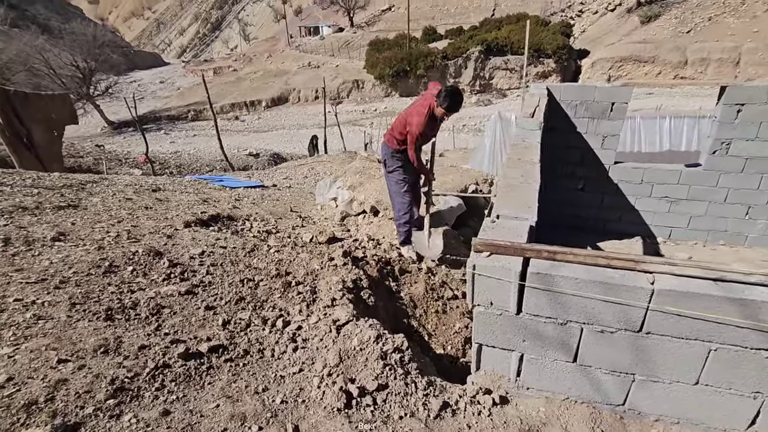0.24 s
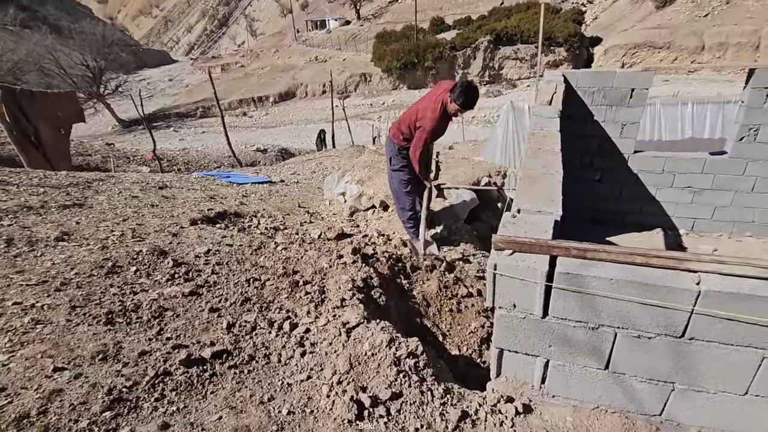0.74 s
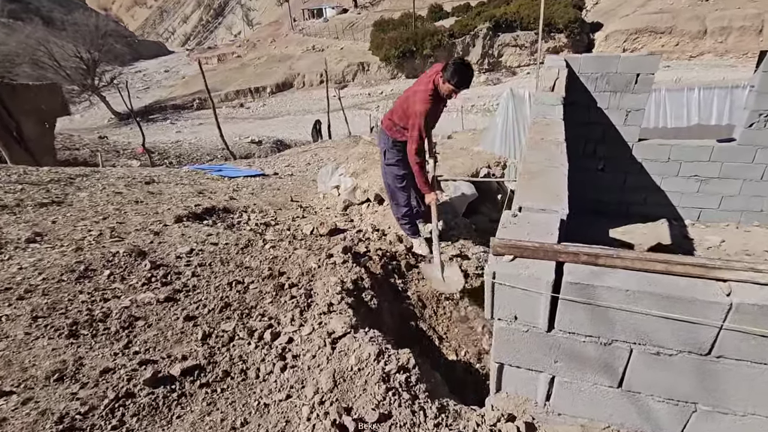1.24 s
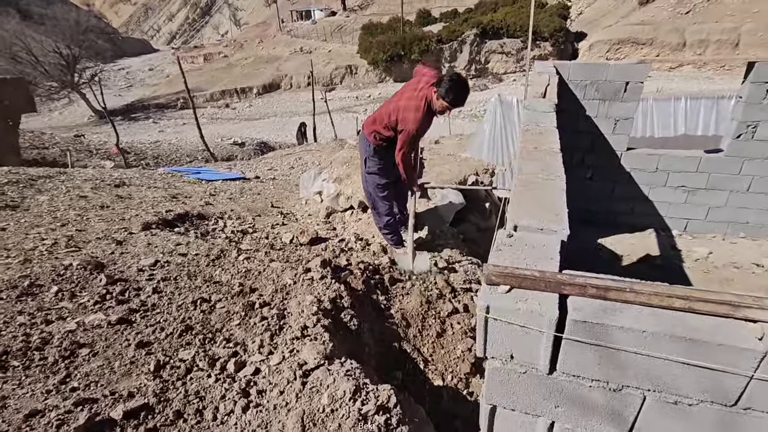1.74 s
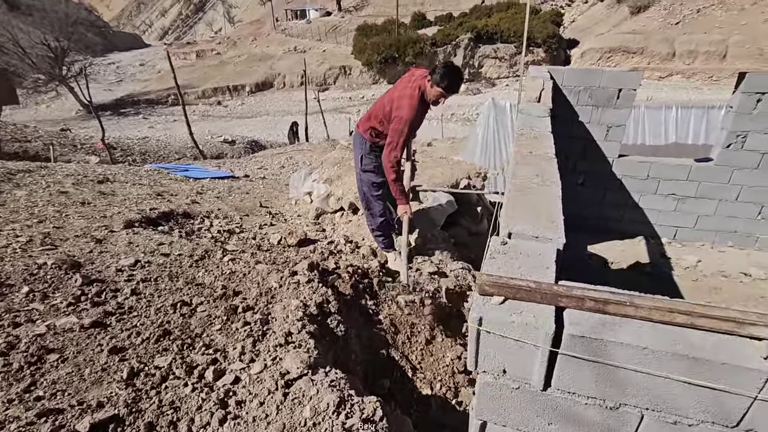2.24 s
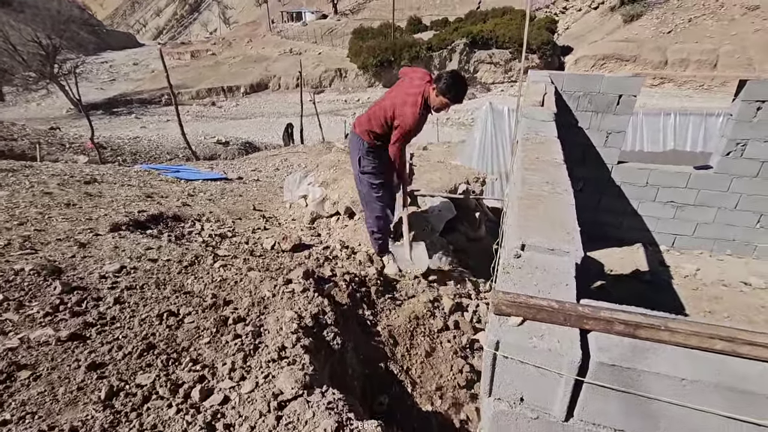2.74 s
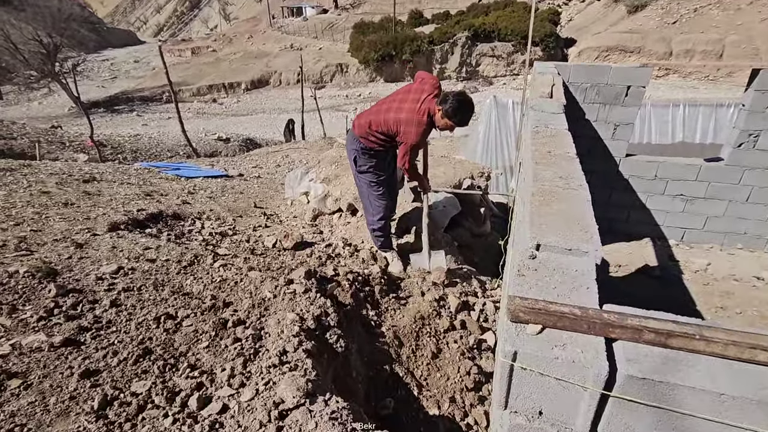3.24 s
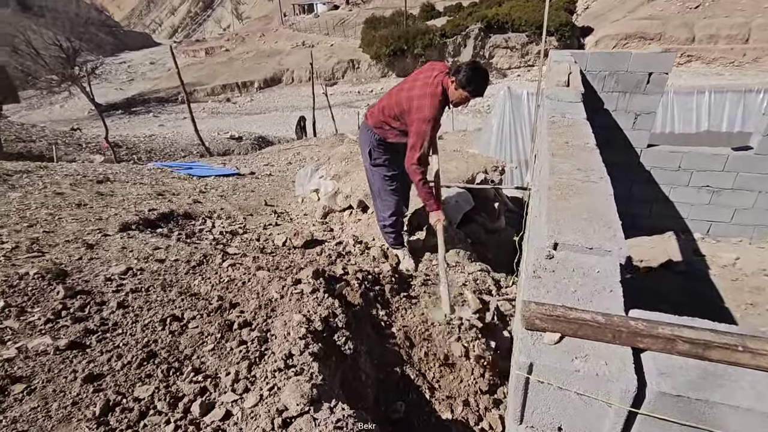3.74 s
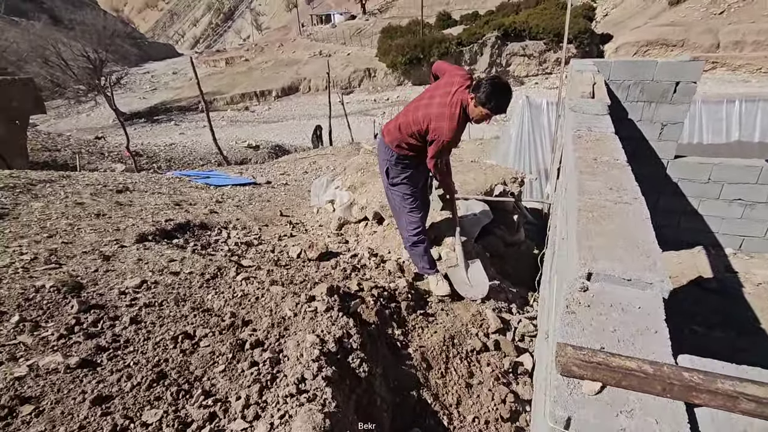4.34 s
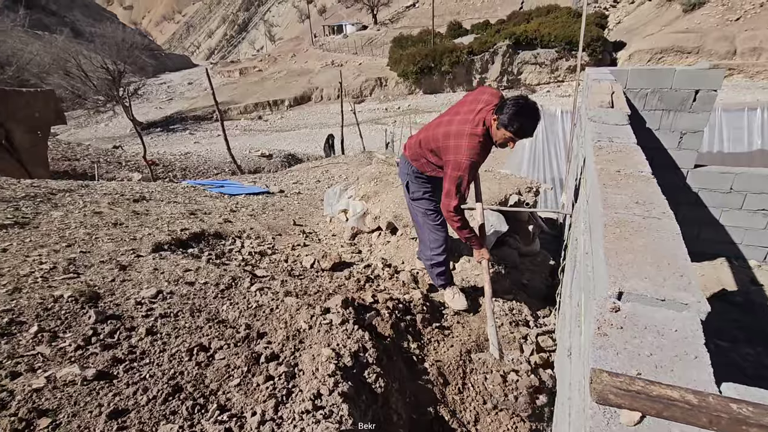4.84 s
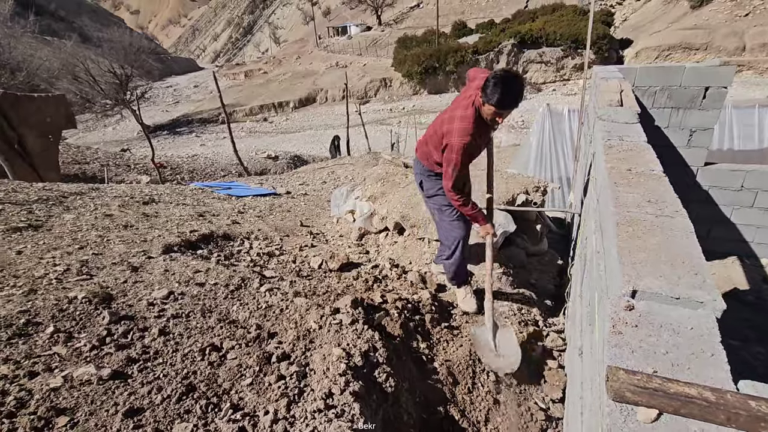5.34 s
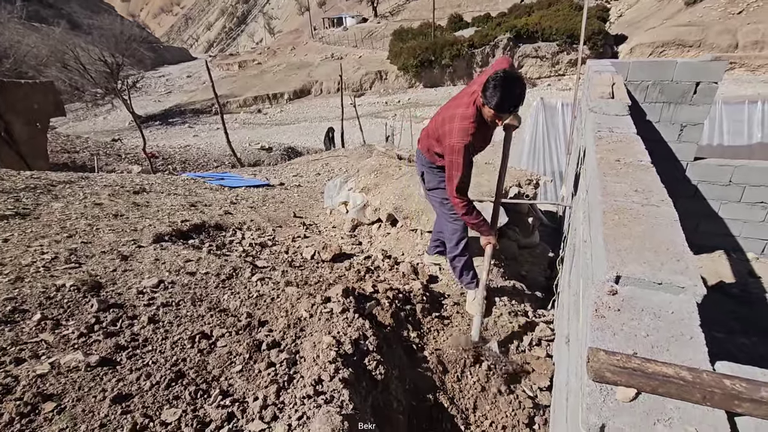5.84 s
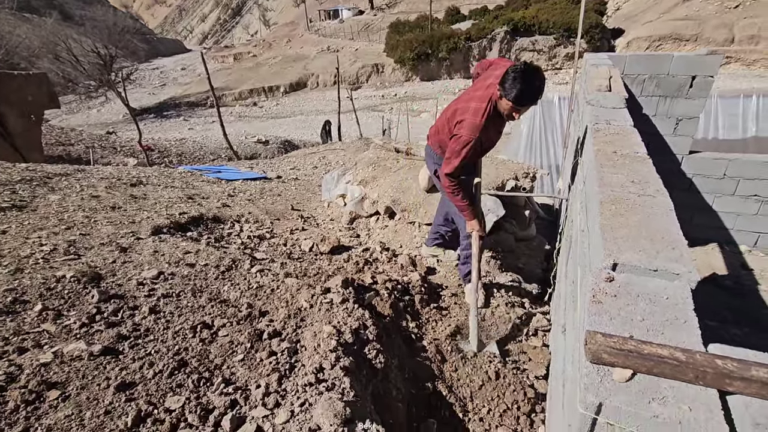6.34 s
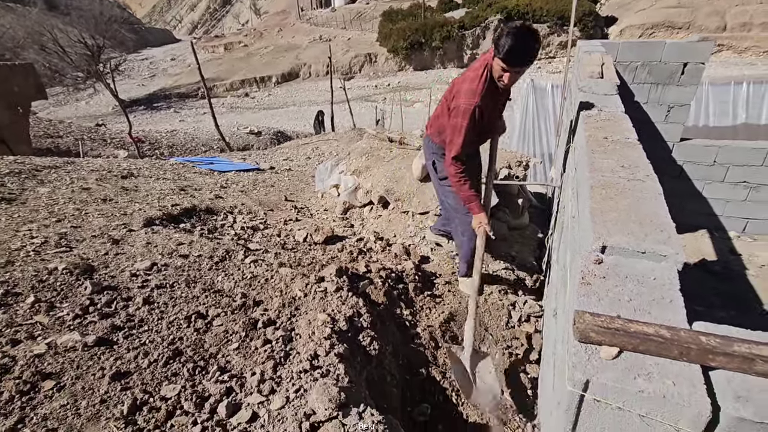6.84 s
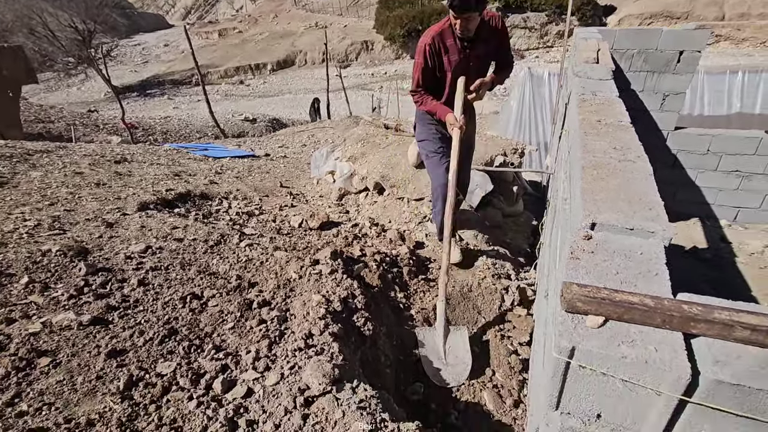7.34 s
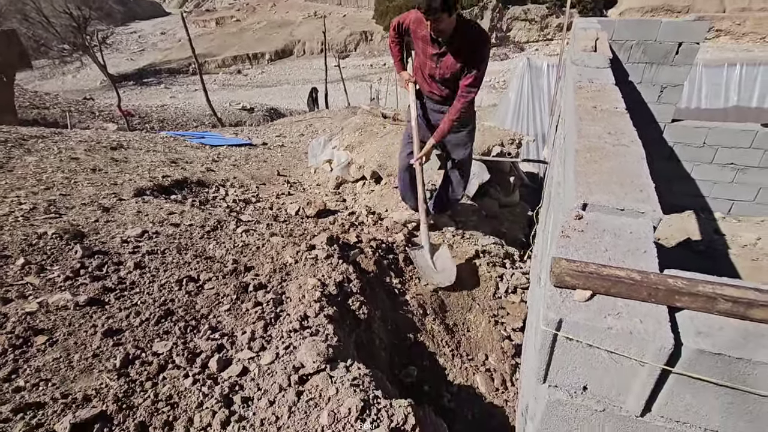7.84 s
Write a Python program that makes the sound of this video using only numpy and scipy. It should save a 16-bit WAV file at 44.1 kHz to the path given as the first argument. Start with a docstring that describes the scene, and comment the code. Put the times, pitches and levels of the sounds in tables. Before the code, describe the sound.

Outdoors, a few metres from a stereo pair, a shovel blade scrapes and jabs into gravelly earth. Each stroke crunches, clinks against stones and trails off in gritty rustle and small ticks; the metal rings briefly when lifted and sounds dead when buried. Clods thud softly. Quieter gaps separate the strokes, the middle ones are densest, and a hard bright strike comes late before light scraping. A close wall adds a tight, noisy slap over barely audible air.

```python
"""Shovel in stony ground

A steel shovel digs beside a block wall, outdoors, a few metres from a pair of microphones.
Clumped noise grains make the grit grinding along the blade; short crumbling bursts are stones knocking it.
The same force rings the blade's modes, long in the air and damped when buried, while pebbles tick.
Clods and steps thud as short low sines over a soil rumble. The wall throws back a short noisy echo.
Banded noise makes the faint hiss of the open air."""
import sys
import numpy as np
from scipy import signal
from scipy.fft import rfft, irfft
from scipy.io import wavfile
from scipy.ndimage import map_coordinates

SR = 44100
rng = np.random.default_rng(int(sys.argv[2]) if len(sys.argv) > 2 else 0)


def wav_record(signal):
    """Record a signal, one row per channel, as 16-bit PCM in the file named by sys.argv[1]."""
    frames = np.transpose(np.atleast_2d(signal))
    bounded = np.clip(frames, -1, 1)
    # unit amplitude maps onto the largest positive 16-bit level
    quanta = np.round(bounded * 32767).astype(np.int16)
    wavfile.write(sys.argv[1], SR, quanta)


N = 357210

# Stones knock the blade; levels set the contact before its colouring, t60 before each range's fall power:
# start_s, edge_db, body_over_edge_db, crack_over_edge_db, body_hz, clink_hz, contact_t60_s
STONE_KNOCKS = [(0.0236, -45.5, -13, -31, 760, 1250, 0.025), (0.5652, -29, -4.5, 2, 528, 1400, 0.081),
                (0.5988, -28.5, -3.5, -19, 467, 1263, 0.077), (0.635, -28, -16.5, -27, 530, 2220, 0.04),
                (0.6877, -50, 9.5, -15, 520, 2780, 0.04), (0.7471, -40.5, -6.5, -13, 700, 1135, 0.06),
                (0.7754, -29.5, -12.5, -14, 582, 2680, 0.05), (0.8175, -21.5, -19, -2, 527, 3100, 0.018),
                (0.842, -26.5, -36, 0, 520, 2620, 0.014), (0.871, -31, -37, -13, 540, 2490, 0.033),
                (0.924, -30.5, -16.5, -3, 690, 1496, 0.04), (1.139, -32, -22, -6, 720, 3020, 0.014),
                (1.321, -47.5, -25, 10, 530, 2230, 0.015), (1.358, -44.5, -23, -4, 533, 2470, 0.019),
                (7.233, -50, -23, -17, 546, 1270, 0.027), (7.386, -43, -34, -2.5, 540, 3190, 0.03),
                (0.9085, -20, -36, -13, 715, 2180, 0.011), (1.078, -34.5, -12.5, -21, 541, 2070, 0.032),
                (1.2494, -39, -19, -11, 544, 2200, 0.017), (1.2996, -44, -14, -17, 463, 1920, 0.077),
                (1.5887, -43, -24, -31, 522, 1320, 0.01), (1.7456, -23.5, -12, -4, 564, 1280, 0.044),
                (1.791, -20.5, -11, 8.5, 870, 2230, 0.037), (1.8106, -24.5, -5, -11, 355, 1420, 0.041),
                (1.8704, -39, -1, -18, 493, 1380, 0.039), (1.919, -36, -8, -10, 600, 1920, 0.033),
                (2.0425, -33, -8, -29, 580, 2000, 0.011), (2.1629, -34, -12.5, -23, 500, 1470, 0.027),
                (2.4006, -49.5, 9.5, -4, 500, 1570, 0.011), (2.6432, -50, 11, -17, 550, 1270, 0.028),
                (2.709, -24.5, -33, -27, 468, 1590, 0.018), (2.741, -32.5, -31, 22.5, 366, 3680, 0.014),
                (2.812, -52, -2, -23, 770, 1230, 0.047), (2.8507, -50, -3.5, -35, 790, 1210, 0.042),
                (2.9454, -45.5, -32, 0, 464, 2860, 0.011), (3.0895, -23.5, 1.5, -5.5, 528, 2157, 0.042),
                (3.1464, -31.5, 3.5, -14, 705, 1510, 0.018), (3.174, -31.5, 1.5, 3.5, 526, 1455, 0.04),
                (3.223, -10.5, 2.5, -8.5, 570, 1710, 0.015), (3.2404, -19.5, -3, -20, 700, 1570, 0.021),
                (3.3412, -27, -0.5, 10, 750, 1410, 0.024), (3.3943, -33.5, -3.5, -1, 478, 1320, 0.12),
                (3.425, -32.5, -10, 4, 555, 1257, 0.057), (3.495, -31, -9, -13, 595, 1480, 0.031),
                (3.571, -29, -5.5, -9, 580, 1366, 0.045), (3.788, -24, -10.5, -6.5, 903, 1510, 0.038),
                (3.8467, -27.5, -9, -18, 617, 2140, 0.022), (3.8605, -12.5, -9.5, -10, 585, 1256, 0.019),
                (3.9365, -28.5, -32, -26, 720, 2020, 0.0073), (4.0577, -42, 4, -14, 640, 1400, 0.018),
                (4.176, -49, -16.5, 9, 533, 1445, 0.043), (2.079, -43.5, 5, 12.5, 556, 3250, 0.013),
                (2.222, -45, -18, -4, 560, 2920, 0.012), (4.4104, -44, 2.5, -10, 525, 1320, 0.13),
                (4.441, -31, -17, 6, 527, 1410, 0.052), (4.4689, -15, -13, 4, 530, 1330, 0.022),
                (4.5144, -22, -10, -15, 637, 1370, 0.023), (4.5499, -17.5, -3, 0, 557, 2050, 0.016),
                (4.6189, -29, 0, -28, 575, 1310, 0.038), (4.672, -28.5, -33, -13, 527, 1370, 0.036),
                (4.7329, -35.5, -13, -14, 490, 1340, 0.033), (5.0261, -40.5, -27, 10.5, 690, 1290, 0.019),
                (5.053, -36.5, -43, -3, 740, 1536, 0.039), (5.3736, -33.5, -6.5, -0.5, 786, 1300, 0.032),
                (5.6072, -60.5, 3, -23, 727, 1300, 0.052), (5.7644, -38.5, -22, -49, 670, 2060, 0.042),
                (5.8087, -30, -21, 8, 626, 1463, 0.16), (5.852, -29, -3, -15, 495, 1330, 0.047),
                (5.8979, -36.5, 7.5, -12, 477, 2970, 0.038), (6.352, -35.5, -28, -26, 506, 1450, 0.013),
                (6.3898, -25.5, -10, -42, 570, 1340, 0.023), (6.486, -43, 10.5, -14, 557, 1370, 0.025),
                (6.5553, -32.5, -11.5, -13, 745, 1390, 0.014), (6.604, -44, -8, -6, 830, 1210, 0.018),
                (6.637, -51, -34.5, 11.5, 406, 1205, 0.02), (6.7386, -44, -21, 2, 714, 1320, 0.056),
                (6.8152, -44.5, -7, 21.5, 686, 2095, 0.017), (6.93, -69.5, 18, 0, 494, 1280, 0.026),
                (7.047, -28.5, -16, -3, 560, 1220, 0.024), (7.0604, -13, -8.5, -9.5, 695, 2230, 0.051),
                (7.0699, -4, -24, -10, 690, 3040, 0.017), (7.1242, -35.5, -0.5, -14, 750, 1080, 0.015),
                (7.3635, -42, -23, 1, 546, 2970, 0.048), (7.447, -51, -7, 3.5, 533, 2130, 0.037),
                (7.5088, -50.5, -3.5, 2.5, 745, 2170, 0.056), (7.8366, -39, -14.5, 10.5, 568, 2090, 0.076),
                (7.894, -33, -29, -42.5, 540, 3180, 0.032), (8.0494, -34.5, -12.5, -11, 575, 2100, 0.051),
                (0.984, -46.5, 1, -10, 470, 2080, 0.019), (1.043, -43.5, -8, -15, 560, 1400, 0.05),
                (1.2273, -54, -15, -9, 900, 2100, .015), (1.644, -60, 14, -14, 500, 1310, 0.013),
                (2.0057, -56.5, 13, -10, 600, 1300, 0.027), (2.0667, -59, 11, -13, 566, 1300, 0.028),
                (2.1431, -41, -8, -15, 595, 1500, 0.039), (2.3601, -48.5, -4.5, -12, 545, 1480, 0.036),
                (3.308, -42, 9, 0, 600, 1400, .02), (3.445, -24, -16, -5, 600, 3250, 0.029),
                (6.429, -44.5, -8, -15, 560, 1380, 0.033), (6.475, -42, -16, -17, 600, 1300, 0.023),
                (6.754, -44, -7, -9, 600, 1250, .015), (8.024, -62.5, 12.5, -7, 474, 1290, 0.022)]
# Scrapes and slides of grit, with levels of the driving gains:
# loudest_s, rise_s, fall_s, edge_db, body_over_edge_db, sand_over_edge_db, soil_over_edge_db
GRIT_SCRAPES = [(.044, 0.09, 0.13, -75, 12, -26, 3), (.144, 0.19, 0.04, -71.5, -4, 3, 6),
                (.247, 0.11, 0.052, -73.5, 2, 6, 7), (.571, 0.0039, 0.017, -28.5, -8, -14.5, -30),
                (0.588, 0.017, 0.059, -45.5, 6.5, 3.5, 10.5), (.688, 0.095, 0.099, -61, 7, -4, -13),
                (.786, 0.046, 0.11, -43, -0.5, -5.5, -40), (0.922, 0.12, 0.074, -45.5, -13, -4.5, -33),
                (1.087, 0.24, 0.23, -57, -7.5, -2, -35), (1.315, 0.11, 0.14, -64.5, -5, -6, -3),
                (1.51, 0.15, 0.21, -81.5, 12, -20, 17.5), (1.748, 0.0075, 0.2, -44, 4, -5, 3),
                (1.801, 0.033, 0.052, -44.5, 10.5, 5.5, 9.5), (1.952, 0.19, 0.094, -57, 9.5, -8, -15),
                (2.154, 0.12, 0.13, -51.5, -1.5, -5.5, -14), (2.23, 0.11, 0.066, -62, -10, -3, -18),
                (2.37, 0.083, 0.17, -60.5, -2.5, -7, -18), (2.45, 0.14, 0.093, -59, -16, -3.5, -17),
                (2.515, 0.22, 0.05, -61.5, -5.5, -2, -20), (2.656, 0.11, 0.19, -71.5, 18, 8, -3),
                (2.73, 0.11, 0.052, -59, -20, -2, 5.5), (2.756, 0.061, 0.034, -61.5, -21, 10, 11.5),
                (2.85, 0.22, 0.35, -82, -17, -20, 9), (3.095, 0.0043, 0.062, -51, 12.5, -1.5, 4),
                (3.167, 0.032, 0.02, -42, 8, -5.5, -21), (3.233, 0.02, 0.025, -37.5, 11, -10, -16),
                (3.33, 0.26, 0.4, -51, 10.5, 0, 2.5), (3.454, 0.043, 0.018, -39.5, 1.5, -4, -3.5),
                (3.56, 0.19, 0.22, -52.5, -9, -5.5, -18), (3.788, 0.06, 0.033, -44.5, 2.5, -13, 0.5),
                (3.871, 0.088, 0.07, -48.5, 5, 1, -20), (4.075, 0.1, 0.1, -57.5, -17, 3, 6),
                (4.295, 0.052, 0.09, -72, 16, -18, 8), (4.419, 0.0063, 0.15, -49.5, 2, -3.5, -27),
                (4.468, 0.029, 0.13, -34, -6.5, -5.5, -18), (4.561, 0.094, 0.18, -43, 5.5, -6, 0),
                (4.725, 0.36, 0.15, -53, -3, -2, -24), (5.07, 0.03, 0.35, -58, -7, -4, -29),
                (4.93, 0.14, 0.6, -64, -1.5, -26, -8), (5.21, 0.27, 0.056, -56, -8, -0.5, -25),
                (5.276, 0.14, 0.18, -76, 19, -8, 23.5), (5.376, 0.11, 0.027, -57.5, -16, 7, 6),
                (5.626, 0.17, 0.086, -73.5, 4.5, -16.5, 1.5), (5.765, 0.0067, 0.21, -46.5, -9, -5, -21),
                (5.82, 0.03, 0.067, -32.5, -6, -3, -18), (5.908, 0.12, 0.025, -45, 9, 5, 9),
                (5.95, 0.046, 0.12, -71.5, 11, -14, 11), (6.1, 0.18, 0.16, -83, -7, 15, -8.5),
                (6.33, 0.047, 0.93, -66.5, 9, -9, -15), (6.487, 0.52, 0.15, -67, 0, -2.5, -20),
                (6.69, 0.11, 0.14, -65, -15, -6, -6), (6.76, .12, 0.12, -56.5, -11.5, -1.5, -25),
                (6.83, 0.13, 0.062, -61, -5, 3.5, -11), (7.068, 0.0089, 0.0066, -24.5, -10, -17, -30),
                (7.09, 0.088, 0.062, -56.5, 12, 4.5, 5.5), (7.2, 0.3, 0.17, -64.5, -11, -1.5, -14),
                (7.3, 0.14, 0.1, -72, 1, 6, -4), (7.376, 0.075, 0.044, -61, -14, -3, -3),
                (7.454, 0.11, 0.015, -71, 9, -3, 3), (7.519, 0.024, 0.02, -68, 4.5, -11, -3),
                (7.697, 0.022, 0.072, -56.5, -4, 3.5, -15), (7.733, 0.04, 0.016, -58.5, -26.5, 10.5, -19.5),
                (7.79, 0.13, 0.12, -69, -15, 8, -20), (7.839, 0.031, 0.079, -51, -20, 2.5, -35),
                (7.895, 0.095, 0.013, -62, -4.5, 4.5, -23.5), (8.063, 0.046, 0.04, -51.5, -9.5, -1.5, -1.5)]
SWELL_DB = 20  # a scrape gains this much over its rise and loses it over its fall
# Modes of the blade: mode_hz, relative_level_db, free_air_t60_s
BLADE_MODES = [(172, -8, .12), (421, -12, .35), (524, 0, .11), (700, -1, .33), (797, -12, .15),
               (900, -5, .26), (1255, -7, .12), (1400, -8, .08), (1472, -4, .12), (1522, -5, .1),
               (1615, -9, .1), (1918, -11, .12), (2090, -5, .08), (2165, -6, .08), (2550, -7, .07),
               (2920, -8, .06), (3020, -9, .07), (3330, -9, .06), (3720, -14, .06), (3930, -14, .06),
               (4700, -15, .05), (5070, -15, .05), (5450, -16, .05)]
BURIED_T60_SHARE = 0.13
# Spells with the blade out of the soil: from_s, to_s, freedom (0-1)
BLADE_LIFTS = [(.88, 1.3, .6), (2.12, 2.6, .35), (3.84, 3.94, .7), (5.03, 5.25, .45), (6.65, 6.95, .4),
               (7.2, 7.6, .85), (7.66, 8.2, .7)]
LIFT_RAMP_S = 0.033  # the blade comes free and sinks back over this time
# Brightness of the edge, low in loose soil and high on bare stone: time_s, upper_over_lower_db
EDGE_BRIGHTNESS = [(0, -3), (.8, 2), (1.05, -7), (1.3, -2), (1.9, -4), (2.15, -9), (2.42, -9), (2.52, -5),
                   (2.7, -18), (3.3, -7), (3.45, -1.5), (3.8, -2), (4.1, -7.5), (4.3, -25), (4.45, -1.5),
                   (4.7, -12), (5.1, -13.5), (5.8, 1.5), (6.35, -15), (6.7, -10), (6.8, -1), (7.3, -5.5),
                   (7.85, 3.5), (8.1, -6.5)]
EDGE_TURN_HZ = 1850
# The contact wanders over the blade and favours now one mode, now another
WANDER_DB, WANDER_HZ = 3.0, 8.0
# Colour of stone and soil when struck: freq_hz, relative_level_db (per Hz)
STONE_COLOUR = [(150, -11), (350, -13.5), (540, -0.5), (900, -12.5), (1450, 0), (2500, -5), (4200, -3.5),
                (7000, -3), (11000, -9), (16000, -10)]
# Pitches that part body from edge and edge from crack: split_hz
RANGE_SPLITS_HZ = [1100, 4000]
# Clods and steps on the soil: start_s, envelope_peak_db, pitch_hz, t60_s, rise_ms (time constant)
SOIL_THUDS = [(0.591, -45, 98.5, 0.17, 1.2), (0.777, -43.5, 229, 0.065, 0.77), (1.067, -57, 214, 0.084, 1),
              (1.254, -53.5, 271, 0.075, 1), (1.489, -35.5, 123, 0.036, 12), (1.524, -52, 118, 0.092, 4),
              (1.76, -44, 87, 0.24, 2.3), (1.801, -26.5, 280, 0.067, 0.76), (1.827, -38, 85, 0.044, 1),
              (2.39, -52, 285, 0.037, 0.89), (2.746, -45.5, 142, 0.064, 4.5), (3.785, -46, 48.3, 0.12, 13),
              (4.085, -48, 42.3, 0.13, 12), (1.855, -42, 50, .15, 10), (5.93, -45.5, 45, .15, 7.7),
              (3.173, -26, 128, 0.024, 1), (3.21, -34.5, 115, 0.15, 2.2), (3.34, -26.5, 212, 0.013, 1.2),
              (3.763, -40.5, 153, 0.043, 1), (3.85, -38.5, 180.5, 0.16, 1.1), (4.061, -54, 128, 0.1, 4.4),
              (4.455, -40, 135, 0.086, 1.2), (4.538, -39.5, 100, 0.24, 2), (5.258, -40.5, 140, 0.041, 1),
              (5.333, -42.5, 96.9, 0.075, 1), (5.601, -55, 198, 0.04, 1), (5.809, -57, 125, 0.1, 1),
              (5.867, -27.5, 98, 0.031, 1.1), (6.369, -54, 205, 0.072, 1), (6.933, -53, 110, 0.054, 2),
              (7.045, -32, 97.7, 0.056, 0.91), (8.021, -45, 108, 0.039, 0.92)]
# Where the blade is: time_s, left_lag_samples, left_over_right_db
BLADE_PLACE = [(0, 1, -0.5), (1, 1, 0.7), (1.7, 2, 0.7), (2.2, -0.5, 1.5), (2.8, -0.5, 1), (3.7, 2, 1.5),
               (4.2, 3.5, 1), (5.2, 5, 1), (5.8, 3, 1), (6.7, 4.5, 0.5), (7.2, 0, 0.5), (8.1, 1, 1)]
ECHO_DRIFT_HZ = 11
# Colour of the open air: freq_hz, relative_level_db (per Hz)
AIR_COLOUR = [(25, 0), (120, -9), (390, -15), (600, -8), (1000, -15), (1400, -14), (2900, -22), (5500, -29),
              (9000, -34), (16000, -35)]
AIR_DB = -70.5
# Likeness of the air at the two microphones: freq_hz, left_right_likeness (-1 opposed, 0 unrelated, 1 alike)
AIR_ALIKE = [(60, 0.39), (240, 0.088), (950, 0.23), (3770, -0.64), (15000, 0.73)]
STOP_HZ = 16300


def shovel():
    """Stone and soil crunch directly; the same force rings the blade, long where free, short where buried."""
    force, notes = contacts()
    free = freedom()
    tilt_db, = in_time(EDGE_BRIGHTNESS)
    body, edge, crack = signal.oaconvolve(force, stone_answers(), axes=1)[:, :N]
    low_pass = signal.butter(4, EDGE_TURN_HZ, fs=SR, output="sos")
    high_pass = signal.butter(4, EDGE_TURN_HZ, "high", fs=SR, output="sos")
    lower = from_db(-tilt_db / 2) * signal.sosfilt(low_pass, edge)
    upper = from_db(tilt_db / 2) * signal.sosfilt(high_pass, edge)
    out = notes + body + crack + lower + upper
    for hz, level_db, t60 in BLADE_MODES:
        # modes above the body range share the brightness of the edge
        bright_db = np.sign(hz - EDGE_TURN_HZ) * (hz > RANGE_SPLITS_HZ[0]) * tilt_db / 2
        reach = from_db(WANDER_DB * drift(WANDER_HZ) + bright_db)
        push = reach * force[np.searchsorted(RANGE_SPLITS_HZ, hz)]
        # a stone's own note passes into the free blade and wakes the modes near its pitch
        out += from_db(level_db - 24) * ring(free * (push + .17 * notes), hz, t60)
        out += from_db(level_db - 36) * ring((1 - free) * push, hz, t60 * BURIED_T60_SHARE)
    return out


def contacts():
    """Force on the blade in three ranges of pitch, and the short notes of the stones themselves."""
    fine = grains(2500., spread_db=1.5, clump_db=3.0, clump_rate=70.0, smooth=0.8)
    # coarse gravel: separate stones in each range of pitch
    gravel = np.array([grains(110.0, spread_db=3.5, clump_db=3.0, clump_rate=11.0, smooth=0)
                       for _ in range(3)])
    grit = rms_one(fine + from_db([[-5.0], [-8.0], [-13.0]]) * gravel)
    force, notes = grit * scraping()[:3], np.zeros(N)
    t = np.arange(4000) / SR
    chips = rng.standard_normal((len(STONE_KNOCKS), len(t)))
    chips[:, 25] = 5.0  # one clean click just after the start
    for knock, chip in zip(STONE_KNOCKS, chips):
        s, edge_db, body_db, crack_db, body_hz, clink_hz, t60 = knock
        # the contact builds in about a millisecond, then crumbles away, the crack fastest
        build = 1 - np.exp(-t / 0.00095)
        fall = from_db(-60 * t / max(t60, .003)) ** np.array([[1.2], [1.1], [1.6]])
        gains = from_db(edge_db + np.array([[body_db], [0], [crack_db]])) * build * fall
        body_note = 1.99 * gains[0] * np.sin(2 * np.pi * body_hz * t)
        clink = 0.7 * gains[1] * np.sin(2 * np.pi * clink_hz * t)
        at = round(s * SR)
        force[:, at:at + len(t)] += (from_db(-8.5) * gains * chip)[:, :N - at]
        notes[at:at + len(t)] += (body_note + clink)[:N - at]
    return force, notes


def scraping():
    """Gains of body, edge, fine sand and soil rumble: each scrape swells and fades, powers add."""
    t, power = np.arange(0, N + 32, 32) / SR, 0
    for s, rise, fall, edge_db, body_db, sand_db, soil_db in GRIT_SCRAPES:
        away = np.maximum((s - t) / max(rise, .002), (t - s) / max(fall, .002))
        levels_db = edge_db + np.array([[body_db], [0], [sand_db], [soil_db]])
        power = power + from_db(levels_db - SWELL_DB * away) ** 2
    return np.array([np.interp(np.arange(N) / SR, t, np.sqrt(p)) for p in power])


def freedom():
    """How freely the blade hangs, 0 buried to 1 in the air."""
    t = np.arange(N) / SR
    spells = [share * np.clip(.5 + np.minimum(t - start, end - t) / LIFT_RAMP_S, 0, 1)
              for start, end, share in BLADE_LIFTS]
    return np.clip(np.max(spells, axis=0), 0, 1)


def stone_answers():
    """Causal response of stone and soil to a click, split into body, edge and crack, each of unit energy."""
    hz = np.maximum(np.arange(2049) * SR / 4096, 20)
    cepstrum = irfft(np.log(from_db(at_hz(STONE_COLOUR, hz))))
    cepstrum[1:2048] *= 2  # folding the cepstrum gives the minimum phase
    whole = irfft(np.exp(rfft(cepstrum[:2049], 4096)))[:2000]
    body = band(whole, 150, RANGE_SPLITS_HZ[0])
    edge = -band(whole, *RANGE_SPLITS_HZ)  # turned over so that it adds to the body where they meet
    crack = band(band(whole, RANGE_SPLITS_HZ[1], 21000), RANGE_SPLITS_HZ[1], 21000)
    parts = np.array([body, edge, crack])
    return parts / np.sqrt(np.sum(parts ** 2, axis=1, keepdims=True))


def pebbles():
    """Small stones tick at random under the scrapes, each ringing a few cycles at one of ten pitches."""
    sizes = from_db(2.4 * np.minimum(rng.exponential(1, N), 4)) * rng.choice([-1, 1], N)
    born = rng.random(N) < 90 / SR  # 90 ticks a second
    dealt = rng.integers(0, 10, N)
    ticks = 0
    for k, hz in enumerate(np.geomspace(900, 6000, 10)):
        ticks = ticks + ring(sizes * born * (dealt == k), hz, 12.0 / hz)
    return from_db(-2.5) * scraping()[1] * rms_one(ticks)


def soil():
    """Lumpy low rumble of moving earth, and soft pushes that ring a few cycles."""
    rumble = band(grains(300., spread_db=3.0, clump_db=2.5, clump_rate=15., smooth=.8), 50, 230)
    out = scraping()[3] * rms_one(rumble)
    t = np.arange(8000) / SR
    for s, peak_db, hz, t60, rise_ms in SOIL_THUDS:
        rise = (1 - np.exp(-1000 * t / max(rise_ms, .2))) ** 2
        shape = rise * from_db(-60 * t / max(t60, .01))
        thud = from_db(peak_db) * shape / shape.max() * np.sin(2 * np.pi * hz * t)
        at = round(s * SR)
        out[at:at + len(t)] += thud[:N - at]
    return out


def placed(x):
    """The sound reaches one microphone a few samples early; contacts wander over blade and trench."""
    lag, pan_db = in_time(BLADE_PLACE)
    sides = np.array([[.5], [-.5]])
    at = np.arange(N) - sides * (lag + 1.14 * drift(37.0))
    gain = from_db(sides * (pan_db + 1.2 * drift(20.)))
    return gain * map_coordinates(x, at[None], order=3)


def scatter(x, t60, low_hz):
    """Wall, trench and rough ground echo differently to each microphone, in a pattern that drifts."""
    t = np.arange(2000) / SR
    echoes = rng.standard_normal((4, 2, len(t))) * from_db(-60 * t / t60)
    echoes = band(echoes / np.sqrt(np.sum(echoes ** 2, axis=2, keepdims=True)), low_hz, 7700)
    shares = np.array([drift(ECHO_DRIFT_HZ) for _ in echoes])
    shares /= np.sqrt(np.sum(shares ** 2, axis=0))  # the four patterns keep a constant total power
    return signal.oaconvolve((shares * x)[:, None], echoes, axes=2).sum(axis=0)[:, :N]


def air():
    """Far hiss: half-octave noise bands swell together, each with its own left-right likeness."""
    out, together = 0, drift(2.5)
    edges = 25 * 2 ** np.arange(0, 9.6, .5)
    white = rng.standard_normal((2, 2, N))
    for k, (low, high) in enumerate(zip(edges, edges[1:])):
        mid, side = band(white[k % 2], low, high)  # neighbouring bands use separate noise
        hz = np.sqrt(low * high)
        alike = np.clip(at_hz(AIR_ALIKE, hz), -1, 1)
        gain = from_db(at_hz(AIR_COLOUR, hz) + 1.6 * together)
        out = out + gain * (np.sqrt(1 + alike) * mid + np.sqrt(1 - alike) * side * [[1], [-1]])
    return from_db(AIR_DB) * rms_one(out)


def grains(per_s, spread_db, clump_db, clump_rate, smooth):
    """Uneven clicks over a share of smooth rubbing noise, both swelling in clumps."""
    sizes = from_db(spread_db * np.minimum(rng.exponential(1, N), 5)) * rng.choice([-1, 1], N)
    clicks = rms_one(sizes * (rng.random(N) < per_s / SR))
    clumps = from_db(clump_db * drift(clump_rate))
    return rms_one(clumps * (clicks + smooth * rng.standard_normal(N)))


def ring(force, hz, t60):
    """A damped resonator: a unit click starts a decaying sine of height 1."""
    r, w = from_db(-60 / (t60 * SR)), 2 * np.pi * hz / SR
    return signal.lfilter([0, np.sin(w)], [1, -2 * r * np.cos(w), r * r], force + 1e-18)


def drift(rate):
    """Slow random wander of spread 1: noise smoothed twice at the rate in Hz, one step per 40 samples."""
    r = np.exp(-80 * np.pi * rate / SR)
    noise = rng.standard_normal(N // 40 + 2002)
    slow = signal.lfilter([1], [1, -2 * r, r * r], noise)[2000:]
    return np.interp(np.arange(N) / 40, np.arange(len(slow)), rms_one(slow))


def band(x, low, high):
    """Butterworth band-pass."""
    return signal.sosfilt(signal.butter(2, [low, high], "band", fs=SR, output="sos"), x)


def at_hz(points, hz):
    """Reads a spectrum on a log frequency axis."""
    freqs, values = np.array(points)[:, 0], np.array(points)[:, 1]
    return np.interp(np.log(hz), np.log(freqs), values)


def in_time(rows):
    """Columns of a curve table, one value per sample."""
    s, *columns = np.transpose(rows)
    return [np.interp(np.arange(N) / SR, s, c) for c in columns]


def rms_one(x):
    """Scales to unit rms."""
    return x / np.sqrt(np.mean(x ** 2) + 1e-20)


def from_db(db):
    """Decibels to gain."""
    return 10 ** (np.asarray(db) / 20)


def scene():
    """Digging, its echo and the open air."""
    digging = band(shovel() + pebbles() + soil(), 40, 21000)
    wall = from_db(-8.0) * scatter(digging, t60=0.029, low_hz=878)
    return placed(digging) + wall + air()


def record(dry):
    """A steep low-pass cuts the top, 60 dB down from STOP_HZ upward."""
    return signal.sosfilt(signal.cheby2(14, 60, STOP_HZ, fs=SR, output="sos"), dry)


dry = scene()
out = record(dry)
wav_record(out)
```